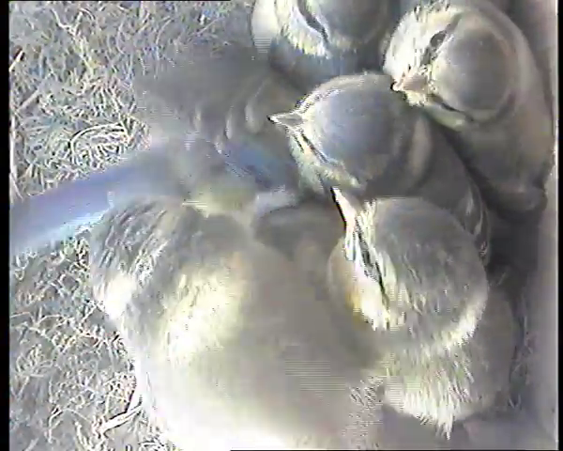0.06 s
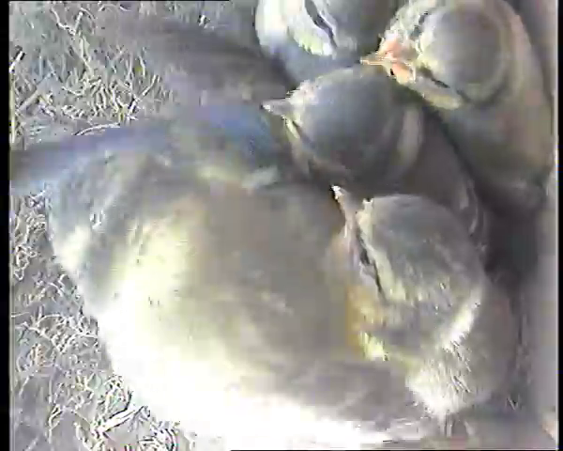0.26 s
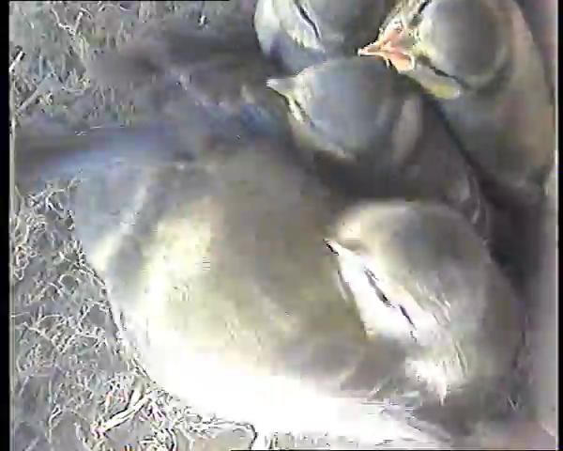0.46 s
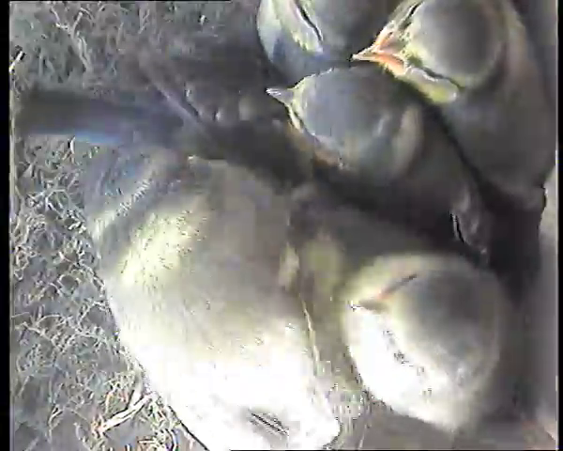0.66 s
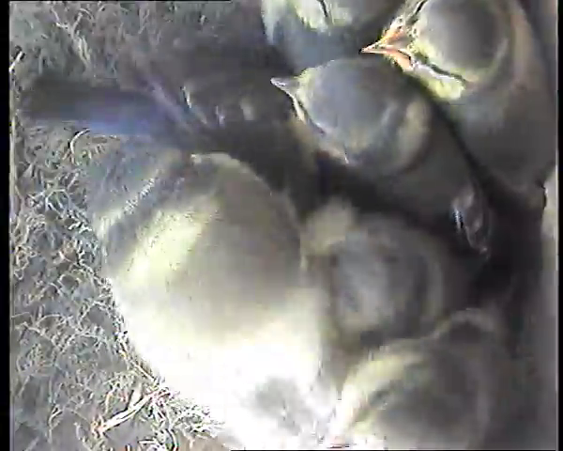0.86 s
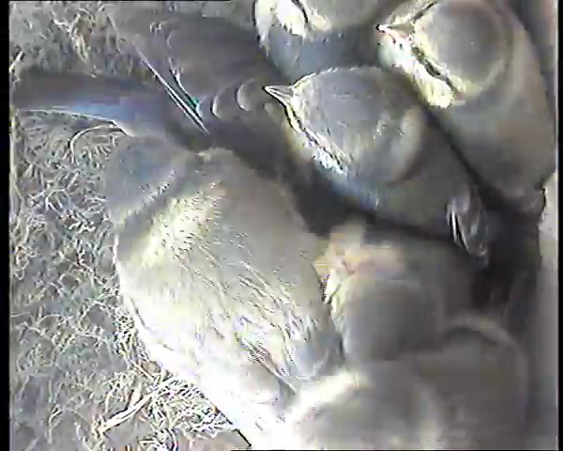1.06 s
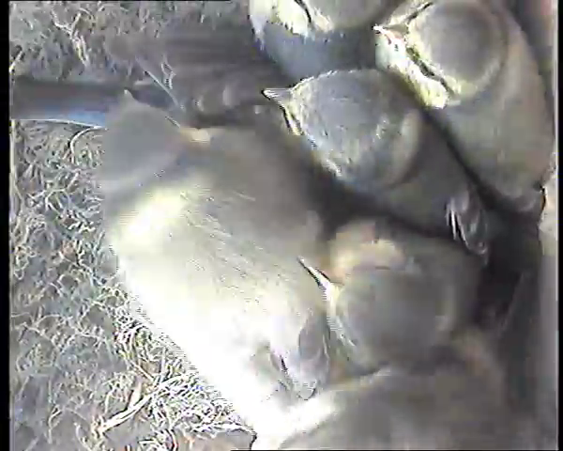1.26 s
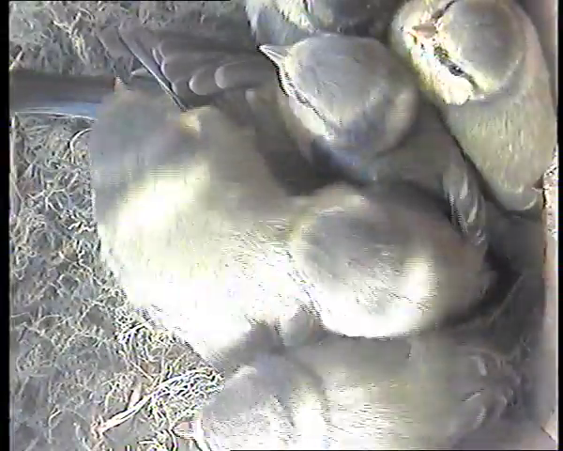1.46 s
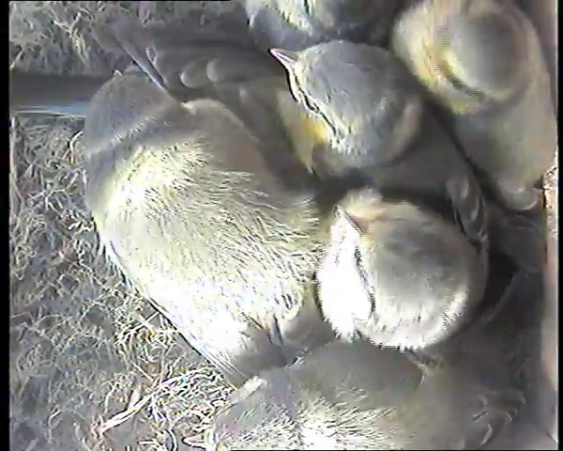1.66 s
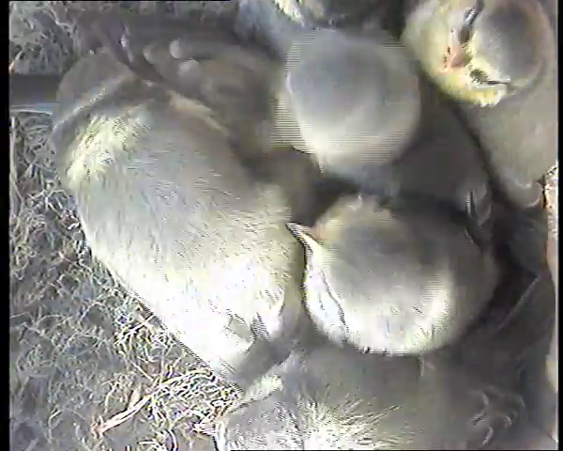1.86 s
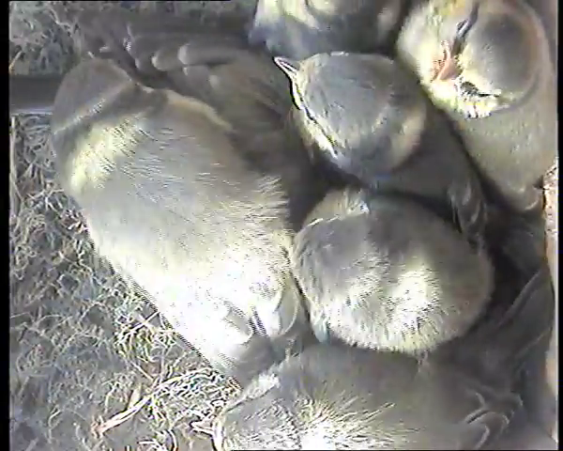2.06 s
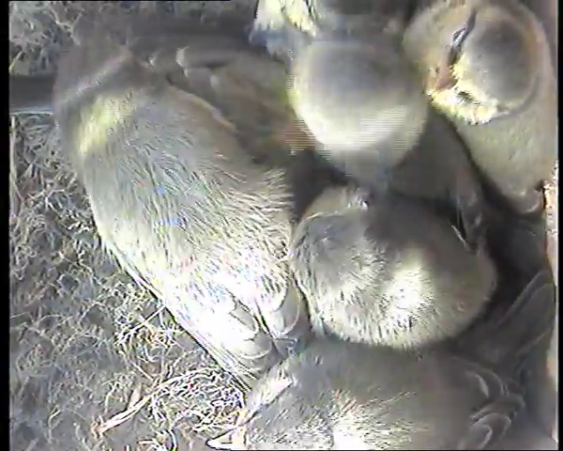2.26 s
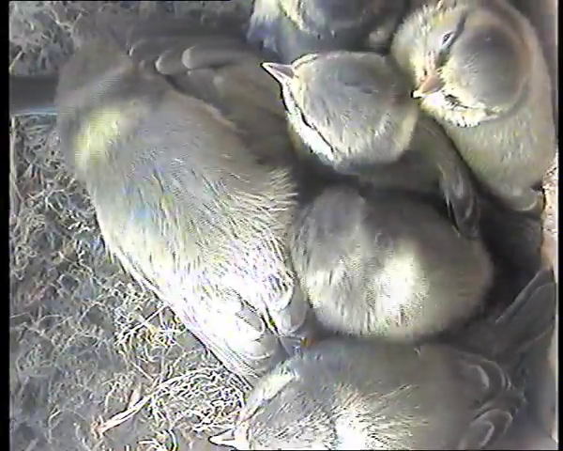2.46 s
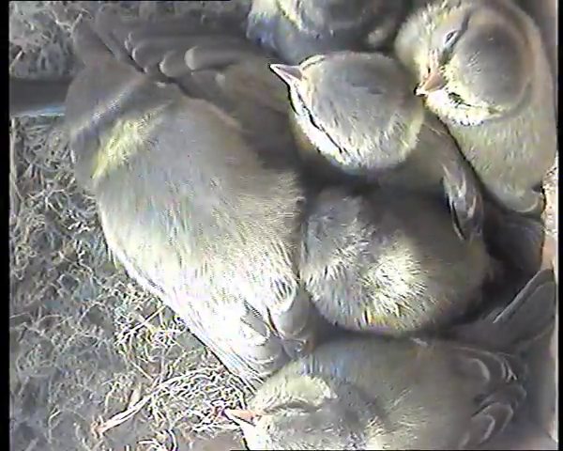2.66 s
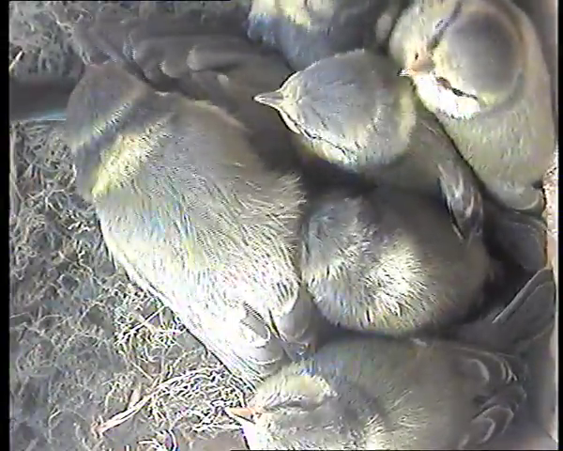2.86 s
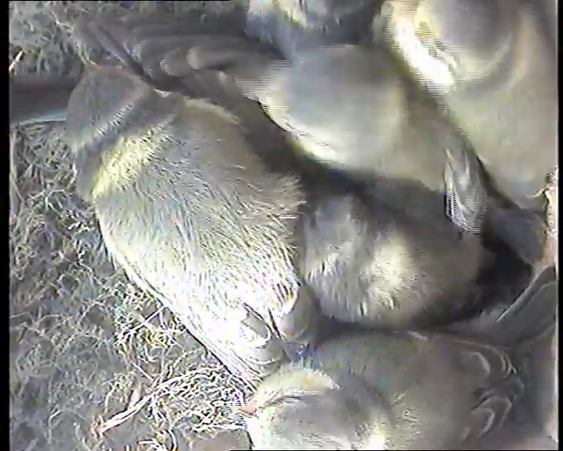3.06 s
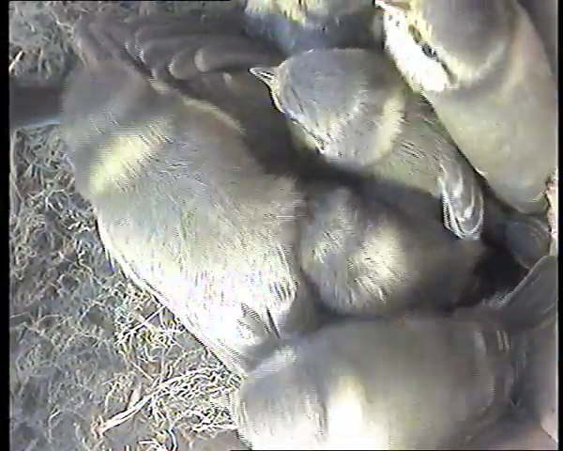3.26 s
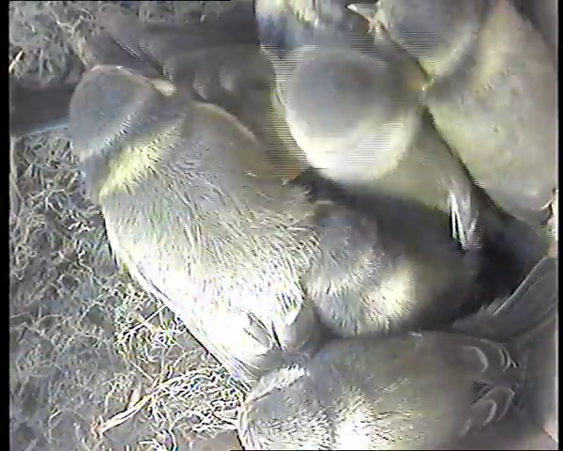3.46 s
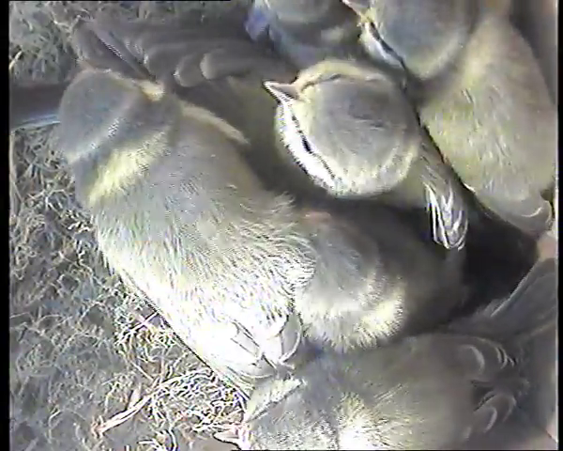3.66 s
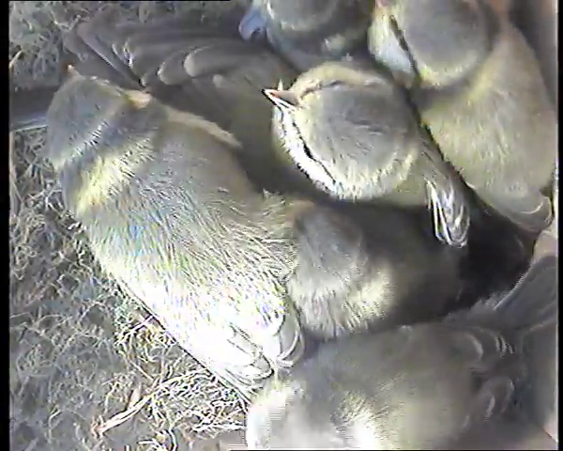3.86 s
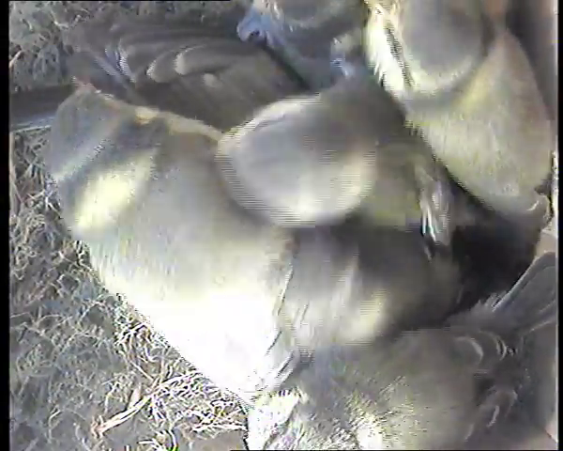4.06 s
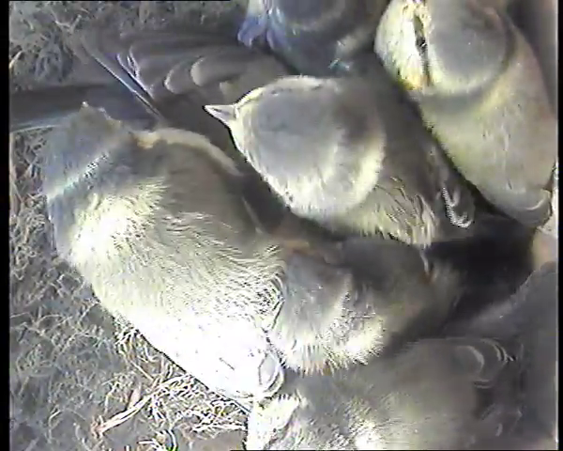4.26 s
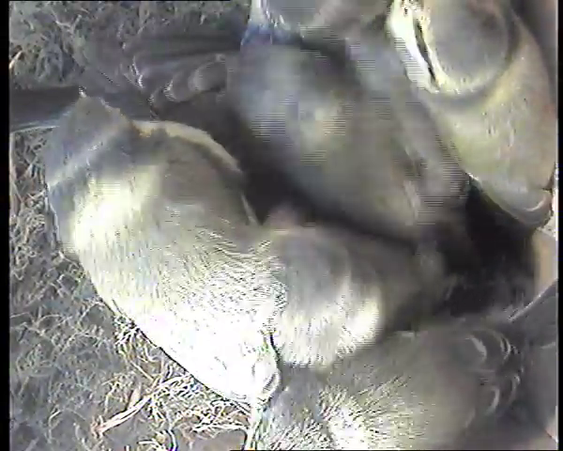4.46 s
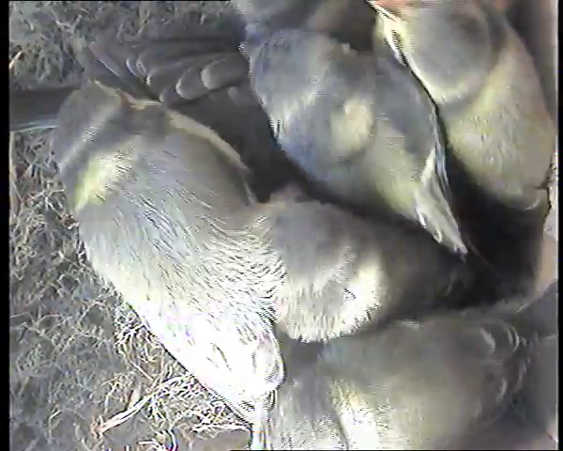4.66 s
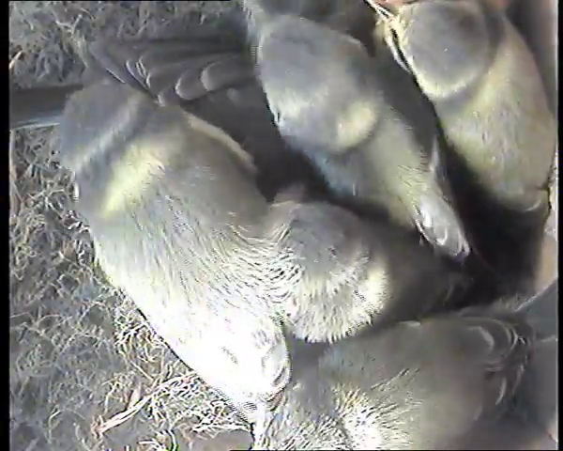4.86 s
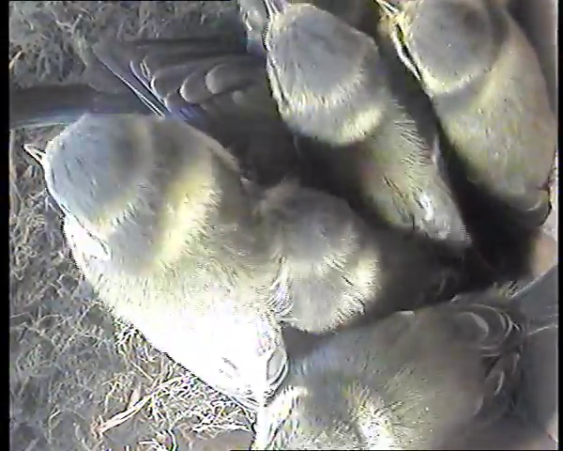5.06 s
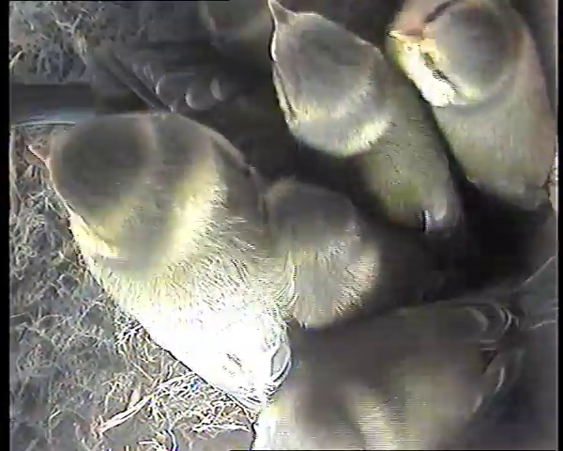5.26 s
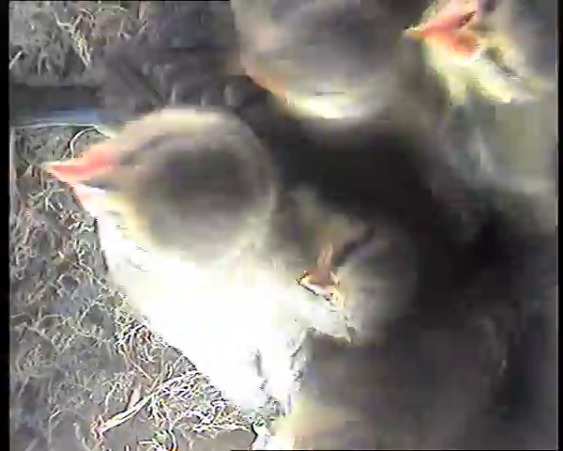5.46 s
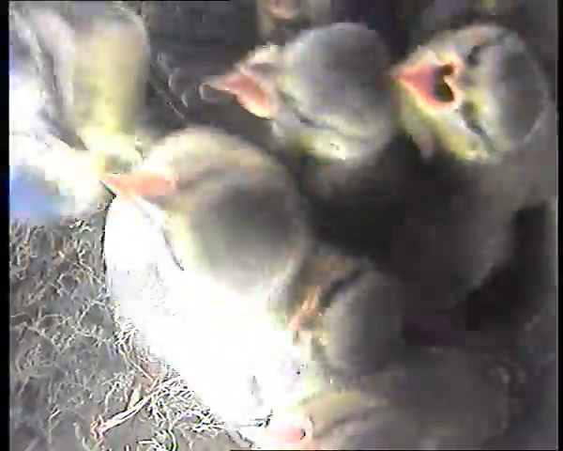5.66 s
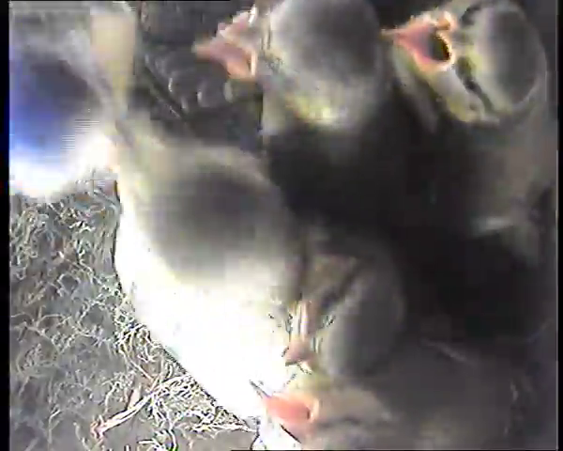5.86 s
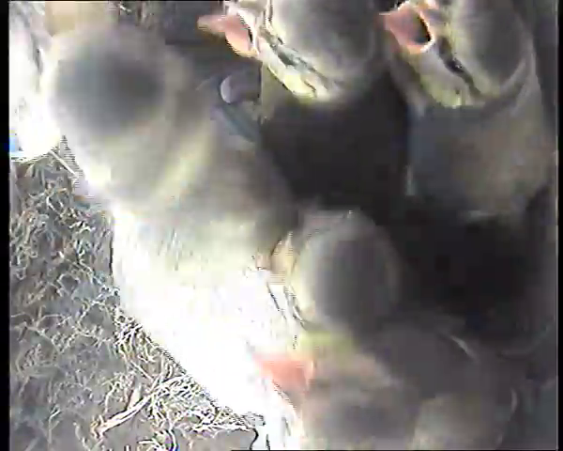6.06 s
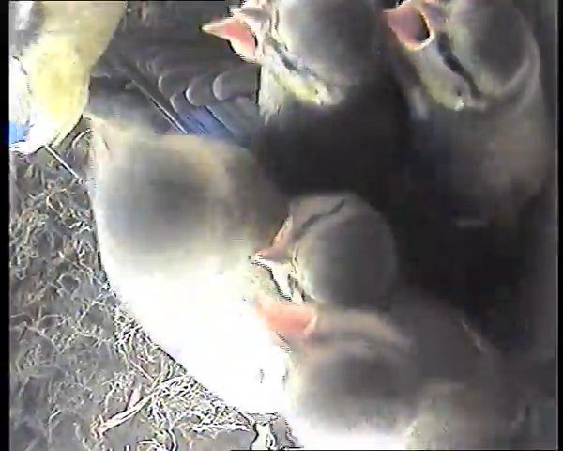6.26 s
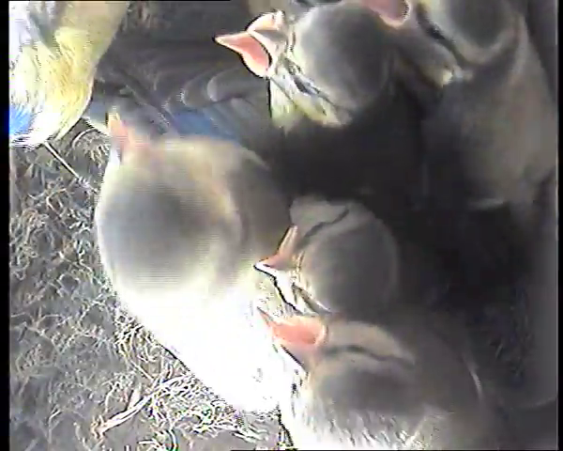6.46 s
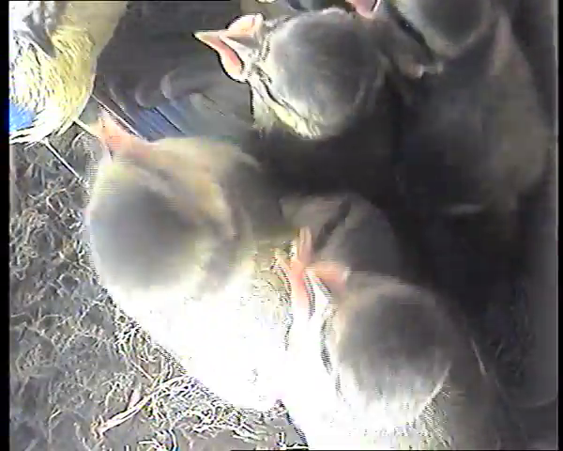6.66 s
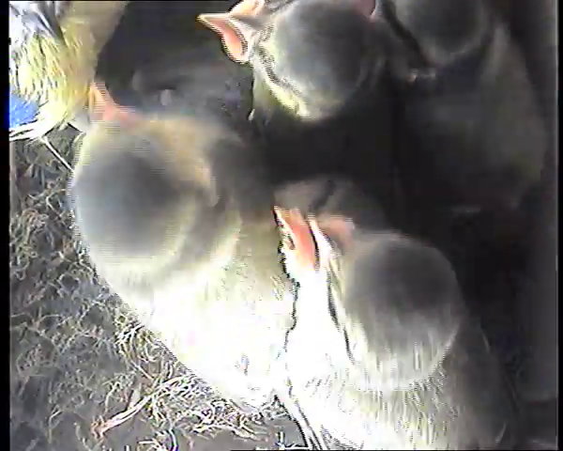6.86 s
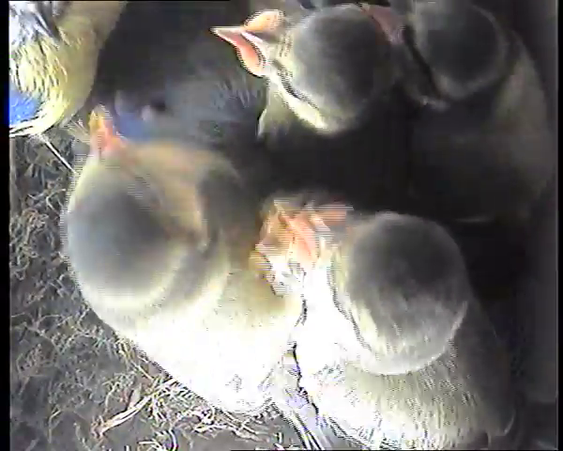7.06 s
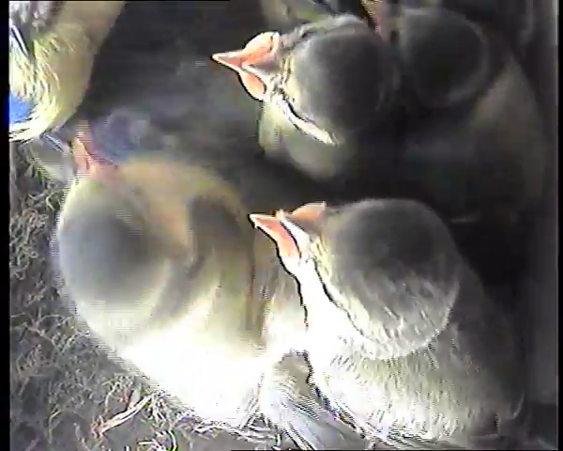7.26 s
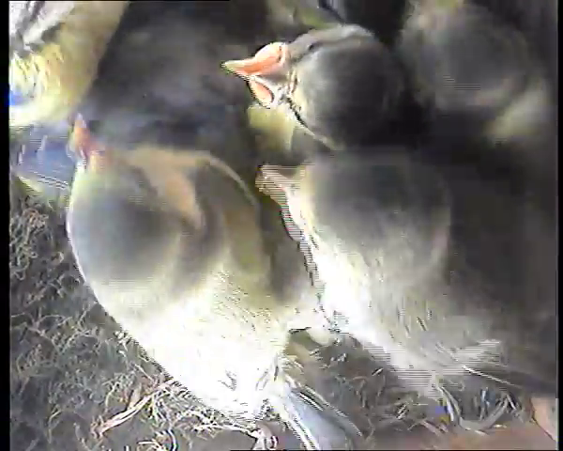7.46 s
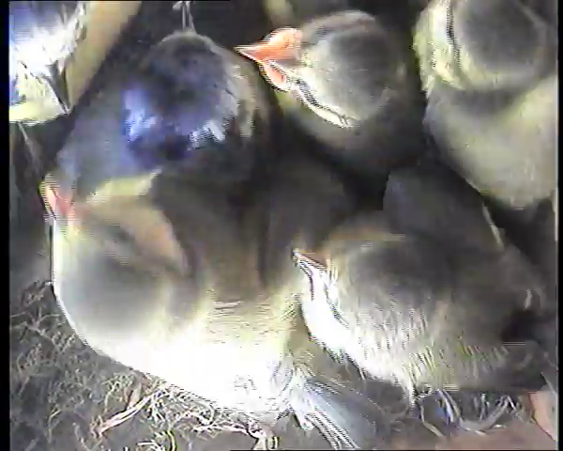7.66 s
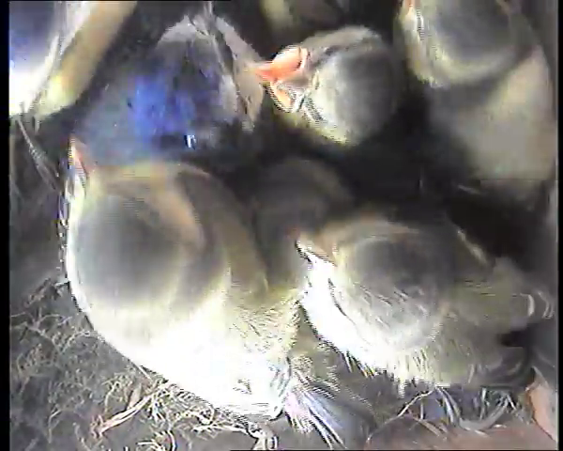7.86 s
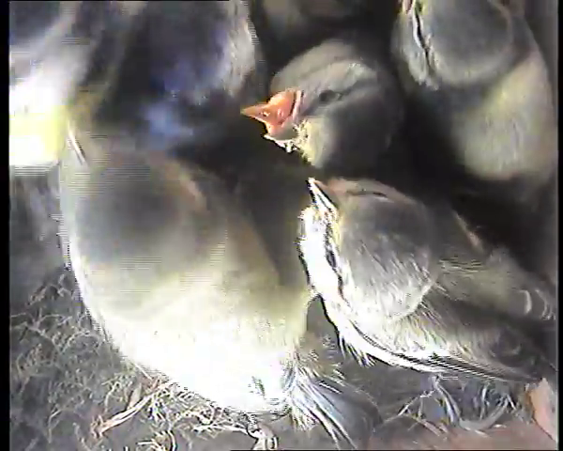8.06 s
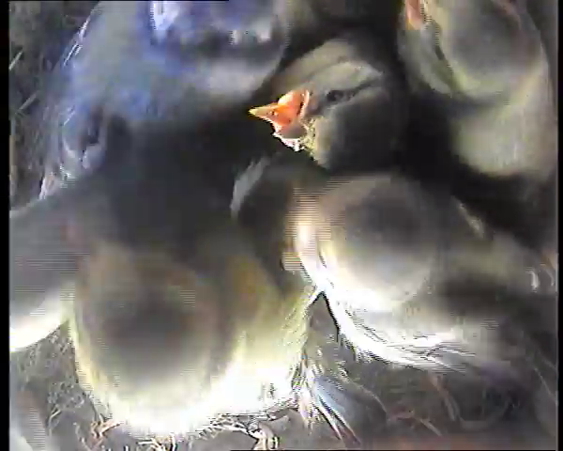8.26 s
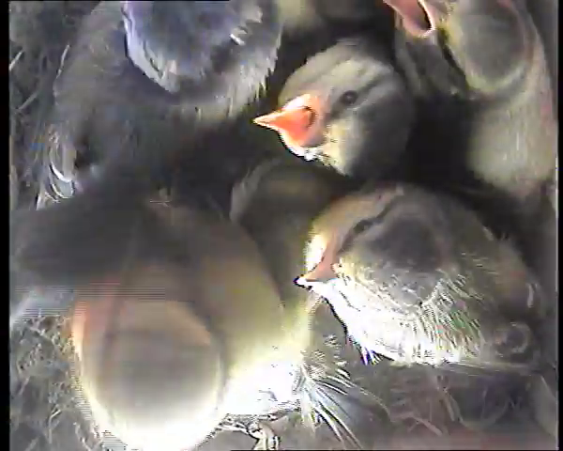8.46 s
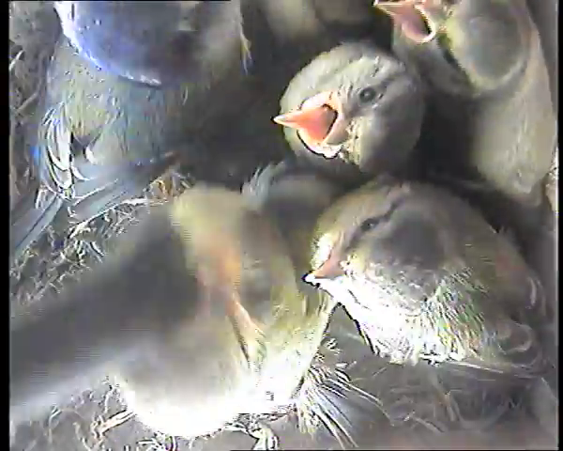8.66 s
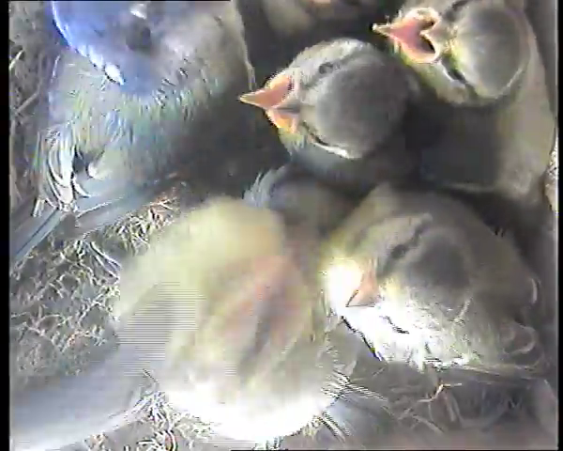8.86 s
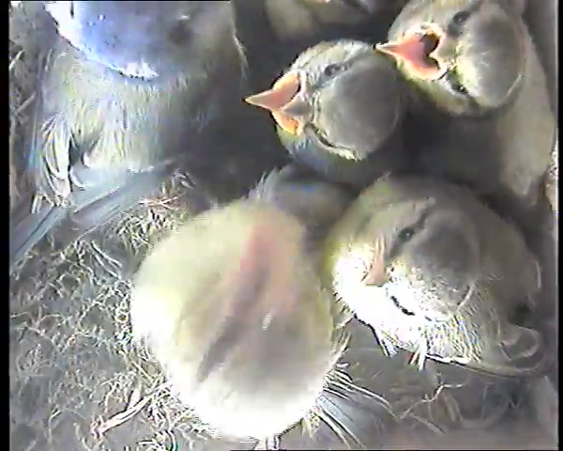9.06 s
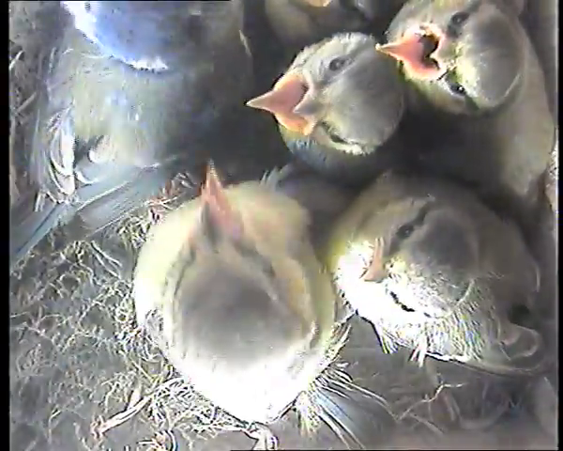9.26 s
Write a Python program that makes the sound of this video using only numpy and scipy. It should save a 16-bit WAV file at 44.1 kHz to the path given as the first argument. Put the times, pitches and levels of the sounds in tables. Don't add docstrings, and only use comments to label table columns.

```python
import sys
import numpy as np
from scipy import signal
from scipy.fft import rfft, irfft
from scipy.io import wavfile

SR = 44100
rng = np.random.default_rng(int(sys.argv[2]) if len(sys.argv) > 2 else 0)


def bounce(signal):
    frames = np.transpose(np.atleast_2d(signal))
    limited = np.clip(frames, -1, 1)
    pcm = np.round(limited * 32767).astype(np.int16)
    wavfile.write(sys.argv[1], SR, pcm)


def invert_db(x):
    u = np.asarray(x, float) / 20
    return 10 ** u


N = 411448

# t/s, length/s, level/dB, gape (beak opening) as level of the top resonances/dB, f/Hz
MELLOW_CALLS = [(0.191, 0.1, -30.5, -20.5, 2266), (1.517, 0.059, -39, -14.5, 2316),
                (2.044, 0.078, -38, -13.5, 2730), (2.241, 0.067, -35.5, -27, 2230),
                (2.825, 0.058, -31, -21.5, 2296), (2.918, 0.053, -30, -21, 2253),
                (3.003, 0.081, -32.5, -24.5, 2522), (3.272, 0.069, -35, -20, 2200),
                (3.922, 0.049, -33.5, -31, 2243), (4.041, 0.054, -31, -25, 2265),
                (4.152, 0.049, -33, -20.5, 2325), (4.343, 0.07, -33.5, -22, 2220),
                (6.351, 0.049, -34.5, -14, 2258), (6.391, 0.1, -33, -10.5, 2255),
                (6.508, 0.059, -30.5, -11.5, 2272), (6.59, 0.056, -32.5, -10, 2380),
                (7.675, 0.055, -32.5, -16, 2240), (7.764, 0.047, -32, -16, 2248),
                (8.951, 0.049, -34.5, -48, 2233)]
# t/s, length/s, level/dB, gape/dB, f/Hz
SHRILL_CALLS = [(.316, 0.051, -31, -13.5, 2390), (0.392, 0.051, -32.5, -9, 2440),
                (0.79, 0.082, -32, -12, 2630), (1.691, 0.086, -32, -14, 2650),
                (1.813, 0.063, -30.5, -18.5, 2294), (2.149, 0.067, -32.5, -16, 2600),
                (3.155, 0.077, -31, -23, 2416), (4.236, .1, -32.5, -20.5, 2347),
                (5.917, .12, -30.5, -12, 2626), (6.803, 0.076, -31.5, -10.5, 2590),
                (6.975, 0.093, -35, -9.5, 2567), (7.842, 0.056, -33, -10.5, 2330),
                (8.054, 0.074, -32, -12, 2386), (8.576, 0.074, -33, -9.5, 2432),
                (8.815, 0.09, -33, -8, 2645)]
# t/s, length/s, level/dB, gape/dB
TONELESS_RASPS = [(0.031, 0.066, -39.5, -24), (0.072, 0.051, -32.5, -28), (0.486, 0.049, -34.5, -8.5),
                  (0.622, 0.037, -33.5, -8.5), (1.382, 0.082, -34, -26), (1.89, 0.069, -33, -12.5),
                  (2.011, 0.045, -30.5, -12), (2.113, 0.042, -35, -48), (2.721, 0.047, -44, -39),
                  (3.397, 0.068, -34, -18), (4.88, 0.049, -40, -27), (4.994, 0.043, -38.5, -49),
                  (5.068, .042, -42.5, -49),
                  (5.353, 0.063, -32, -9.5), (5.412, 0.055, -29.5, -15), (5.456, 0.054, -35, -2),
                 (5.506, .073, -28.5, -8), (5.568, 0.079, -31.5, -7.5), (5.615, .095, -32, -7.5),
                 (5.689, 0.045, -44.5, 5), (5.745, 0.064, -32, -11), (5.806, 0.044, -31, -5),
                 (5.84, 0.055, -39.5, -4.5), (6.126, 0.098, -31.5, -21.5), (6.209, 0.037, -52, -2),
                 (6.3, .056, -36.5, -9.5), (6.563, 0.031, -31.5, -13), (6.675, 0.064, -30.5, -10.5),
                 (7.063, 0.067, -34, -36), (7.16, 0.055, -33.5, -23), (7.276, 0.076, -30, -19.5),
                 (7.382, .117, -34, -9.5), (7.499, 0.054, -38.5, -6), (7.599, 0.074, -40.5, -4),
                 (7.936, 0.049, -32.5, -9.5), (8.402, 0.074, -33.5, -12), (8.48, 0.081, -31, -14.5),
                 (8.682, 0.068, -34, -7), (9.089, 0.064, -35.5, -22.5), (9.243, 0.058, -34, -14),
                 (9.3, 0.047, -39, -15)]
# extra level of the middle resonances/dB,
# share of the sound that a long throat draws down in pitch/0-1
MELLOW_THROATS = [(.1, 0.6), (.1, 0.1), (.1, .4), (.1, 0.5), (.1, 0.4), (.1, 0.23), (.1, 0.5), (.1, 0.56),
                  (.1, 0.56), (.1, 0.66), (.1, 0.49), (.1, 0.47), (.1, .4), (.1, 0), (.1, 0.3), (.1, 0.68),
                  (.1, 0), (.1, 0.31), (.1, 0.36)]
SHRILL_THROATS = [(.1, 0.31), (.1, 0.33), (.1, 0.17), (.1, 0.27), (.1, 0.32), (.1, .3), (.1, 0.43),
                  (.1, 0.49), (.1, 0.28), (.1, 0.26), (.1, .4), (.1, 0.28), (.1, 0.16), (.1, 0.41),
                  (.1, 0.19)]
TONELESS_THROATS = [(.1, .4), (.1, 0.36), (.1, 0.65), (.1, .4), (.1, 0.61), (.1, 0.9), (.1, .3), (.1, .4),
                    (.1, 0.32), (3, 1), (.1, 0.76), (.1, .4), (.1, .4),
                    (.1, 0.39), (.1, 0.37), (.1, .4), (.1, 0.57), (.1, 0.21), (.1, 0.34), (.1, 0.41),
                   (.1, .4), (.1, 0.46), (.1, 0.52), (.1, 0.18), (.1, 0.38), (.1, 0.26), (.1, 0.32),
                   (.1, 0.41), (.1, 0.26), (.1, .4), (.1, 0.28), (.1, .4), (0.101, 0.31), (.1, 0.38),
                   (.1, 0.35), (.1, 0.36), (.1, 0.3), (.1, 0.35), (0.099, 0.34), (.1, .4), (.1, 0.41)]
MELLOW_TONE_LEVELS = [-44, -44, -41, -43, -40, -40, -41, -45, -39, -39, -41, -46, -41, -42, -41, -41, -40,
                      -40, -41]
SHRILL_TONE_LEVELS = [-42, -43, -42, -38, -42, -40, -42, -43, -43, -38, -41, -41, -41, -40, -39]
MELLOW_HARMONICS = [3, -6, -21, -28]
SHRILL_HARMONICS = [-4, 2, -12, -22]
TAIL_HARMONICS = [-28, 2, -25]
# f/Hz, width/Hz, level/dB
LOW_RESONANCES = [(576, 48, -10), (904, 74, -4.5), (1183, 785, -7.5), (1491, 196, 2), (2152, 156, -4.5),
                  (2530, 1000, -11)]
MIDDLE_RESONANCES = [(3394, 43, 0), (4910, 2500, -7.5), (5496, 408, 5)]
TOP_RESONANCES = [(7283, 65, 10), (8644, 92, 6.5), (10200, 2700, -22)]
EFFORT_POWERS = np.array([[1], [1.3], [1.8], [2.3]])
# t/s, length/s, start f/Hz, end f/Hz, level/dB
THIN_PEEPS = [(1.875, .05, 2550, 2720, -42), (6.735, .018, 2750, 2300, -44), (.05, .015, 2390, 2330, -41),
              (.09, .035, 2250, 2100, -43), (3.41, .052, 2150, 2130, -43), (1.305, .045, 2690, 2700, -53),
              (1.455, .035, 2750, 2780, -52), (1.495, .025, 2480, 2560, -45),
              (1.735, .045, 2050, 2150, -42), (1.4, .055, 2150, 2180, -45), (7.16, .055, 2150, 2180, -45),
              (1.92, .035, 2120, 2430, -43), (2.745, .038, 2620, 2600, -47), (2.97, .04, 2370, 2560, -50),
              (4.885, .055, 2380, 2200, -42), (4.92, .055, 2730, 2560, -46), (5.0, .045, 2250, 2230, -40),
              (5.068, .045, 2450, 2570, -46), (7.4, .075, 2540, 2330, -42), (9.25, .05, 2030, 2150, -43)]
# t/s, length/s, start f/Hz, end f/Hz, level/dB
CLEAR_NOTES = [
    (1.865, .06, 2300, 2750, -45),
    (3.415, .04, 2500, 2700, -44),
    (7.4, .045, 2800, 2900, -47),
    (7.95, .025, 2100, 2900, -44),
    (7.5, .05, 2570, 2630, -41),
    (7.605, .065, 2720, 2760, -38),
]
# t/s, length/s, start f/Hz, end f/Hz, level/dB
SHRILL_TAILS = [(1.3, .05, 2700, 2700, -57), (1.455, .035, 2750, 2800, -56), (1.495, .025, 2480, 2500, -51),
                (7.64, .025, 3080, 2950, -50), (.02, .04, 2380, 2300, -49), (2.72, .055, 2900, 2720, -53),
                (2.735, .045, 2600, 2600, -51), (6.205, .045, 3000, 2930, -49),
                (6.235, .02, 2720, 2640, -41), (4.88, .06, 2750, 2900, -52), (5.055, .03, 2750, 2450, -52)]
# t/s, length/s, start f/Hz, end f/Hz, level/dB
HALF_RATE_BUZZ = [
    (5.65, .04, 1770, 1670, -44),
    (5.775, .065, 1580, 1740, -45),
]
# t/s, length/s, start f/Hz, middle f/Hz, level/dB
LOWER_WHISTLES = [(.526, .024, 7200, 7600, -32), (.66, .03, 7250, 7520, -32), (1.29, .03, 7040, 6900, -63),
                  (2.055, .012, 7100, 7350, -43), (3.895, .05, 6700, 7180, -56),
                  (5.853, .01, 6900, 7050, -40), (5.482, .02, 7140, 7600, -31),
                  (5.54, .022, 7260, 7490, -35), (5.58, .045, 7320, 7620, -26),
                  (5.66, .02, 6950, 7360, -33), (5.71, .042, 7270, 7350, -27),
                  (5.778, .055, 7050, 6920, -40), (6.73, .013, 7140, 7480, -32)]
# t/s, length/s, start f/Hz, middle f/Hz, level/dB
UPPER_WHISTLES = [(.525, .024, 8400, 8950, -28.5), (2.055, .01, 8200, 8450, -44),
                  (.66, .029, 8450, 8880, -28), (5.48, .02, 8180, 9150, -31), (5.58, .045, 8580, 9090, -35),
                  (5.66, .02, 8300, 8770, -39), (5.71, .04, 8700, 8560, -32), (5.78, .06, 8480, 8330, -34),
                  (6.73, .013, 8500, 8820, -30.5)]
# t/s, length/s, top f/Hz, level/dB
UPWARD_FLICKS = [(.429, .014, 7900, -40), (.515, .012, 8200, -39), (.65, .012, 8500, -39),
                 (2.042, .014, 8200, -43), (5.39, .02, 8270, -40), (5.468, .014, 8570, -35),
                 (5.568, .014, 8740, -32), (5.648, .013, 8860, -39), (5.698, .014, 8900, -34),
                 (5.766, .015, 8230, -37), (5.843, .009, 7000, -36), (6.717, .013, 8300, -39),
                 (7.478, .022, 7300, -46), (7.972, .015, 8000, -40), (8.73, .015, 7290, -39)]
# t/s, length/s, start f/Hz, middle f/Hz, end f/Hz, level/dB
FALLING_FLICK = [
    (5.85, .019, 7100, 8150, 7000, -30),
    (5.867, .019, 6100, 4900, 3500, -37),
]
# t/s, f/Hz, level/dB
BEAK_TICKS = [(5.228, 4400, -50), (5.232, 7200, -54), (5.298, 3700, -54), (8.004, 7800, -56),
              (8.01, 6000, -54), (8.036, 8500, -51), (8.042, 5500, -51), (8.19, 5400, -57),
              (8.208, 5700, -51), (8.232, 3800, -54), (8.234, 6000, -55)]
# t/s, peak level/dB, f/Hz
WOOD_KNOCKS = [(.981, -39, 900), (1.03, -32, 700), (1.067, -29, 1010), (1.165, -44, 900), (1.21, -31, 1100),
               (2.53, -23, 600), (2.816, -27, 900), (3.354, -24, 800), (3.495, -27.5, 900),
               (3.679, -35, 1000), (4.013, -29, 695), (4.484, -33, 600), (4.537, -37, 400),
               (4.679, -25, 800), (4.718, -32, 800), (4.938, -17, 790), (5.209, -18, 1110),
               (5.216, -29, 500), (5.227, -22, 710), (5.231, -13.5, 600), (5.236, -10, 620),
               (5.245, -23, 500), (5.253, -28, 550), (5.261, -30, 600), (5.276, -18.5, 598),
               (5.288, -23, 554), (5.298, -20.5, 980), (5.499, -20.5, 500), (5.525, -21, 503),
               (5.882, -25.5, 399.5), (6.097, -27, 803), (8.05, -28, 609), (8.213, -18, 610),
               (8.217, -14, 520), (8.228, -21, 600), (8.239, -18, 800), (8.248, -21, 1100),
               (8.253, -20, 600), (8.27, -22.5, 700), (8.279, -23, 796), (8.291, -19, 970),
               (8.309, -21, 805), (8.318, -23, 700), (8.326, -32, 1200), (8.493, -25, 602),
               (8.52, -25, 603), (8.918, -19.5, 600), (9.098, -23, 706), (9.3, -29, 601)]
# f/Hz, level/dB, time to fade by 60 dB/s
WOOD_MODES = [(216, -18, 0.031), (392, -8, 0.052), (530, 2.5, 0.017), (605, 3, 0.044), (870, -1.5, 0.032),
              (1040, 7.5, 0.015), (1380, 6.5, 0.02)]
# t/s, rustle level/dB, drone level/dB
NEST_STIR = [(0.0, -49, -42), (0.44, -48, -37.5), (0.99, -50.5, -39.5), (5.12, -55.5, -39),
             (5.19, -72, -32.5), (5.34, -51, -36.5), (5.59, -51, -36.5), (6.31, -49, -40.5),
             (8.7, -48, -39), (9.33, -50, -42)]
# f/Hz, level per Hz/dB
ROOM_NOISE = [(12, -39), (20, -2), (125, -5), (219, -1), (426, -26), (629, -15.5), (786, -30), (955, -17.5),
              (1860, -35), (8590, -32.5), (15400, -33)]


def rasps(rise_db=8.5, fall_db=19.0, edge_s=.006):
    gains, rate, long = np.zeros((4, N)), np.zeros(N), np.zeros(N)
    rows = MELLOW_CALLS + SHRILL_CALLS + TONELESS_RASPS
    throats = MELLOW_THROATS + SHRILL_THROATS + TONELESS_THROATS
    calls = sorted(row[:4] + throat for row, throat in zip(rows, throats))
    fastest = rng.uniform(600, 1200, (len(calls), 1))
    peak = 0.7
    for (s, length, db, top_db, throat_db, share), top_hz in zip(calls, fastest):
        i = span(s - edge_s / 2, length + edge_s)
        u = np.linspace(0, 1, len(i))
        away = np.where(u < peak, 1 - u / peak, (u - peak) / (1 - peak))
        edges = np.clip(np.minimum(u, 1 - u) * length / edge_s, 0, 1)
        shape = invert_db(1.5 - np.where(u < peak, rise_db, fall_db) * away ** 2) * edges
        middle_db = -5 + 0.36 * top_db + throat_db
        highest_db = 2.5 + 1.25 * top_db
        group_db = np.array([[0], [middle_db], [top_db], [highest_db]])
        gains[:, i] = np.hypot(gains[:, i], shape ** EFFORT_POWERS * invert_db(db + group_db))
        long[i] = np.clip(share + 0.45 * (.5 - u), 0, 1)
        rate[i] = top_hz * (1 - .3 * (u - .7) ** 2)
    cycles = np.cumsum(rate * (1 + .012 * drift(150))) / SR
    beats = np.diff(np.floor(cycles), prepend=0)
    flutter = invert_db(1.6 * drift(60))
    breath = flutter * rng.standard_normal(N)
    pulses = flutter * beats * np.sqrt(SR / np.maximum(rate, 1))
    source = breath + 1.35 * pulses
    low = butter(resonate(breath + 0.67 * pulses, LOW_RESONANCES), 1870, "low", order=2)
    middle = throat(source, MIDDLE_RESONANCES, long, depth=1)
    top = throat(source, TOP_RESONANCES, long, depth=.3)
    middle = butter(middle, [3100, 6100], "band", order=2)
    highest = butter(top, 7900, "high", order=4)
    top = butter(top, [6100, 7900], "band", order=3)
    return gains[0] * low, gains[1] * middle + gains[2] * top + gains[3] * highest


def throat(source, peaks, long, depth):
    lowered = resonate(source, np.multiply(peaks, [0.9504 ** depth, 1, 1]))
    lifted = resonate(source, np.multiply(peaks, [1.003 ** depth, 1, 1]))
    return np.sqrt(long) * lowered + np.sqrt(1 - long) * lifted


def call_tones(calls, glide, levels_db):
    out = []
    for (s, length, *_, hz), db in zip(calls, levels_db):
        start, end = max(s + .009, s + length - .072), s + length
        out.append((start, end - start, glide[0] * hz, hz, glide[1] * hz, db))
    return out


def mellow_tones():
    table = call_tones(MELLOW_CALLS, (.89, .96), MELLOW_TONE_LEVELS) + arched(THIN_PEEPS, 1.025)
    return notes(table, MELLOW_HARMONICS, jitter=.006, shimmer_db=2.5, taper=.3, hook=.12, rough=.35)


def shrill_tones():
    table = call_tones(SHRILL_CALLS, (.85, 1.025), SHRILL_TONE_LEVELS) + arched(CLEAR_NOTES, 1.02)
    tones = notes(table, SHRILL_HARMONICS, jitter=.006, shimmer_db=3.5, taper=.5, rough=.2)
    tails = notes(arched(SHRILL_TAILS, 1.02), TAIL_HARMONICS, jitter=.008, shimmer_db=3.5, taper=.4,
                  hook=.1, rough=.15)
    return tones + tails


def buzz():
    return notes(arched(HALF_RATE_BUZZ, .99), [-20, 0, -1], jitter=.006, shimmer_db=2.5, taper=.4)


def two_voiced_whistles():
    table = sagging(LOWER_WHISTLES, 6300) + sagging(UPPER_WHISTLES, 8500, drop_hz=240)
    return notes(table, [3], jitter=.001, shimmer_db=.6, taper=.3, fade_db=4, scoop=.07)


def flick_leads():
    table = [(s - .02, .02, 2150, 2600, 3500, db - 6) for s, *_, db in UPWARD_FLICKS]
    return notes(table, [0, -3], jitter=.008, shimmer_db=2, taper=.3)


def fast_flicks():
    rises = [(s, length, 3500, (3500 + hz) / 2 + 450, hz, db) for s, length, hz, db in UPWARD_FLICKS]
    flick = notes(rises + FALLING_FLICK, [7], jitter=.007, shimmer_db=2, taper=.3, fade_db=5)
    flick = butter(flick, 2500, "high", order=1)
    flick = flick - .5 * butter(flick, [5900, 6800], "band", order=1)
    return flick + 0.32 * np.roll(flick, round(0.0024 * SR))


def overdrive(high, square=11.0, fourth=2.0, resonance=1.2):
    hot = high + resonance * butter(high, [8200, 9100], "band", order=1)
    bent = square * butter(hot ** 2, 1800, "low", order=2)
    low = butter(bent + fourth * bent ** 2, 50, "high", order=2)
    sidebands = .8 * high * low
    octaves = 2.6 * butter(high, 6600, "high", order=3) ** 2
    return high + low + sidebands + octaves


def ticks():
    table = [(s, .009, hz * 1.07, hz, hz * .93, db) for s, hz, db in BEAK_TICKS]
    return notes(table, [3], jitter=.02, shimmer_db=2, taper=1)


def knocks():
    size = 3000
    out, time = np.zeros(N + SR), np.arange(size) / SR
    hz, mode_db, t60 = np.transpose(WOOD_MODES)[:, :, None]
    rings = invert_db(mode_db - 60 * time / t60) * np.sin(2 * np.pi * hz * time)
    after = rng.exponential(.002, (len(WOOD_KNOCKS), 14)).cumsum(axis=1)
    signs = rng.uniform(-1.3, 1, (len(WOOD_KNOCKS), 14))
    for (s, db, centre_hz), lags, sign in zip(WOOD_KNOCKS, after, signs):
        reach = np.exp(-(np.log2(hz / centre_hz) / 0.94) ** 2)
        body = np.sum(rings * reach, axis=0)
        clicks = np.zeros(size)
        clicks[0] = 1
        places = np.minimum(lags * SR, size - 1).astype(int)
        np.add.at(clicks, places, invert_db(-2 - 450 * lags) * sign)
        blow = signal.fftconvolve(clicks, body / np.abs(body).max())
        start = round(s * SR)
        out[start:start + len(blow)] += invert_db(db) * blow
    return butter(butter(out[:N], 1500, "low", order=3), 90, "high", order=1)


def rustle(level_db, per_s=900):
    sizes = invert_db(5.1 * np.minimum(rng.exponential(1, N), 5)) * rng.choice([-1, 1], N)
    born = rng.random(N) < per_s * invert_db(6 * drift(9)) / SR
    grains = butter(wood(sizes * born, spread_db=1.5), [300, 1700], "band", order=2)
    return invert_db(level_db) * grains / grains.std()


def wood(clicks, spread_db):
    out = 0
    for hz, db, t60 in WOOD_MODES:
        r, w = invert_db(-60 / (t60 * SR)), 2 * np.pi * hz / SR
        strengths = invert_db(db + spread_db * rng.standard_normal(N))
        struck = clicks * strengths + 1e-18
        out = out + signal.lfilter([0, np.sin(w)], [1, -2 * r * np.cos(w), r * r], struck)
    return out


def drone(level_db):
    return invert_db(level_db - 3.0) * resonate(rng.standard_normal(N), [(197.4, 50.0, 1.5), (133.7, 56, -4.5)])


def hiss():
    hz, db = np.transpose(ROOM_NOISE[:-1])
    bins_hz = np.fft.rfftfreq(N, 1 / SR)
    colour = invert_db(np.interp(np.log(bins_hz + 1), np.log(hz), db))
    noise = irfft(rfft(rng.standard_normal(N)) * colour, N)
    return invert_db(-45.5) * noise / noise.std()


def line_whine():
    return np.sqrt(2) * invert_db(-54.5) * np.sin(2 * np.pi * 15624.4 * np.arange(N) / SR)


def notes(table, overtones_db, jitter, shimmer_db, taper, hook=0, rough=0, fade_db=0, scoop=0):
    out, waver, shimmer = np.zeros(N), 1 + jitter * drift(180), invert_db(shimmer_db * drift(58))
    shimmer = shimmer * (1 + rough * drift(330))
    for s, length, *pitches, db in table:
        i = span(s - scoop / 30, length * (1 + hook) + scoop / 30)
        end_sag = hook * np.exp((i - i[-1]) / (.005 * SR))
        start_sag = scoop * np.exp((i[0] - i) / (.003 * SR))
        sag = 1 - end_sag - start_sag
        phase = 2 * np.pi * np.cumsum(bend(pitches, i) * sag * waver[i]) / SR
        stack = 0
        for k, g in enumerate(overtones_db):
            stack = stack + invert_db(g) * sag ** (12 * k) * np.sin((k + 1) * phase)
        fade = np.linspace(fade_db / 2, -fade_db / 2, len(i))
        out[i] += invert_db(db + fade) * signal.windows.tukey(len(i), taper) * shimmer[i] * stack
    return out


def bend(row, time):
    u = np.linspace(-1, 1, len(time))
    start, middle, end = row
    return middle + (end - start) * u / 2 + (start + end - 2 * middle) * u ** 2 / 2


def arched(table, arch):
    return [(s, length, a, arch * max(a, b), b, db) for s, length, a, b, db in table]


def sagging(table, hz_per_s, drop_hz=0):
    return [(s, length, a, b, b - drop_hz - hz_per_s * length, db) for s, length, a, b, db in table]


def span(s, length):
    return np.arange(round(s * SR), min(round((s + length) * SR), N))


def drift(rate):
    r = np.exp(-2 * np.pi * rate / SR)
    slow = signal.lfilter([1], [1, -2 * r, r * r], rng.standard_normal(N + SR))[SR:]
    return slow / slow.std()


def resonate(x, peaks):
    out = 0
    for k, (hz, width, db) in enumerate(peaks):
        r = np.exp(-np.pi * width / SR)
        ring = [1, -2 * r * np.cos(2 * np.pi * hz / SR), r * r]
        out = out + (-1) ** k * invert_db(db) * signal.lfilter([1 - r * r, 0, r * r - 1], ring, x)
    return out / out.std()


def butter(x, hz, kind, order):
    return signal.sosfilt(signal.butter(order, hz, kind, fs=SR, output="sos"), x)


def scene():
    low, high = rasps()
    voiced = mellow_tones() + shrill_tones() + buzz() + flick_leads() + ticks()
    whistles = two_voiced_whistles()
    hush = 1 / (1 + 40 * butter(np.abs(whistles), 56, "low", order=1))
    birds = low + voiced + overdrive(hush * high + whistles + fast_flicks())
    s, rustle_db, drone_db = np.transpose(NEST_STIR)
    time = np.arange(N) / SR
    nest = knocks() + rustle(np.interp(time, s, rustle_db)) + drone(np.interp(time, s, drone_db))
    return (birds + nest + hiss())[None]


def low_pass(x):
    return signal.sosfilt(signal.butter(12, 16950, fs=SR, output="sos"), x)


def record(dry):
    cut = signal.ellip(12, .2, 60, 15780, fs=SR, output="sos")
    mix = signal.sosfilt(cut, dry + line_whine() - .0014)
    return low_pass(mix)


dry = scene()
out = record(dry)
bounce(out)
```